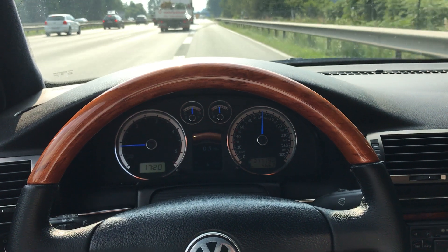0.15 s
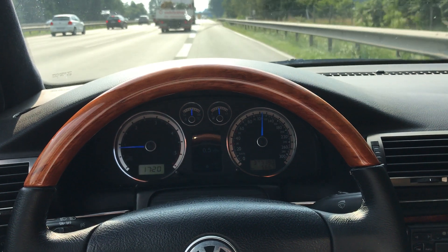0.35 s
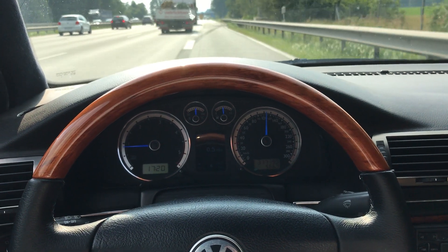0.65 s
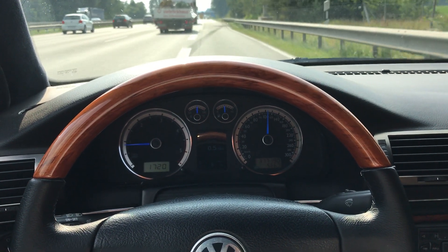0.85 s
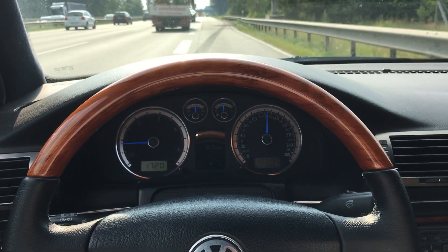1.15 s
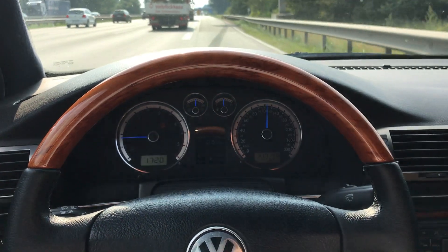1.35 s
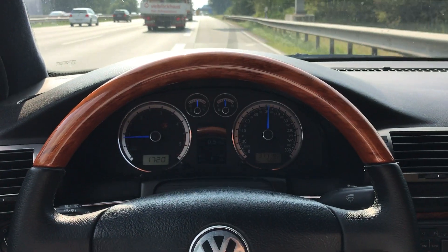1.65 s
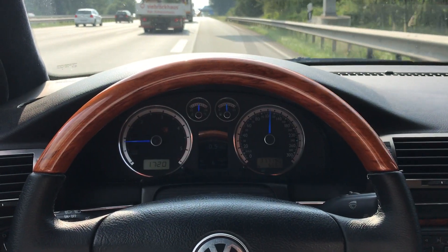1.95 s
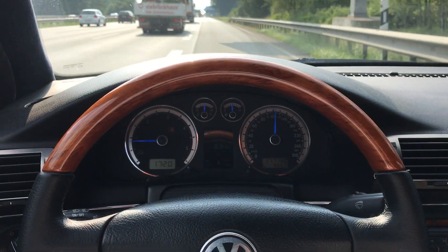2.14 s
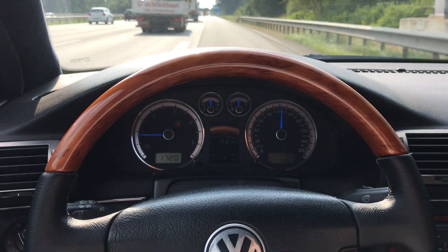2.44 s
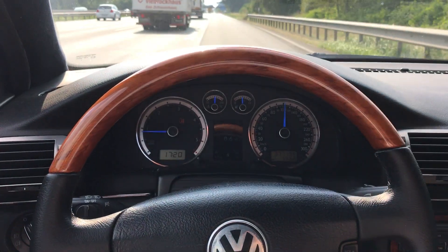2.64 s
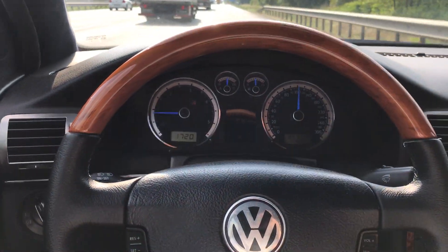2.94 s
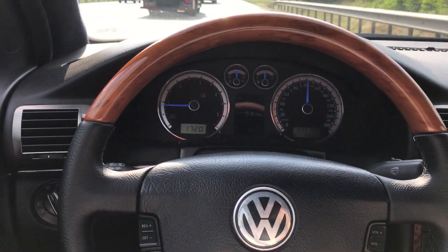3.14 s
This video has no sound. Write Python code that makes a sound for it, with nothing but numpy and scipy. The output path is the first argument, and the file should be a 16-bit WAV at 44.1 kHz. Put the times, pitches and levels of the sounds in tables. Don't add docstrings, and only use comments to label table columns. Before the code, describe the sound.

Inside a cruising car, booming bass rumble wavers with the road surface, strongest around 1.2 and 2.8 seconds. Quiet tyre noise, brief roadside swishes, thin wind hiss and tiny plastic ticks lie underneath; close phone microphone.

```python
import sys
import numpy as np
from scipy import signal
from scipy.fft import rfft, irfft, next_fast_len
from scipy.io import wavfile
from scipy.ndimage import uniform_filter1d

SR = 44100
rng = np.random.default_rng(int(sys.argv[2]) if len(sys.argv) > 2 else 0)


def inscribe(sig):
    pcm = np.round(np.clip(np.atleast_2d(sig).T, -1, 1) * 32767)
    wavfile.write(sys.argv[1], SR, pcm.astype(np.int16))


def linear_from_db(decibels):
    return 10 ** (np.asarray(decibels, float) / 20)


N = 145089

# [t/s, level/dB]
ROAD = [(.09, -23.5), (.3, -19.5), (.5, -24), (.66, -20.5), (.95, -27), (1.08, -19.5), (1.23, -20),
        (1.38, -30), (1.62, -22), (1.8, -22), (1.97, -28), (2.18, -25), (2.32, -24), (2.47, -27),
        (2.66, -26.5), (2.8, -17.5), (3.0, -30.5), (3.2, -21)]
# [t/s, level/dB]
GUST = [(.09, -45.5), (.3, -45.5), (.42, -48.5), (.74, -46), (.86, -48.5), (1.05, -49), (1.21, -45.5),
        (1.35, -50.5), (1.44, -48), (1.78, -47.5), (1.95, -51.5), (2.08, -49.5), (2.3, -48), (2.62, -50),
        (2.78, -47), (2.87, -48), (3.0, -50), (3.28, -47)]


def curve(table):
    return np.interp(np.arange(N) / SR, *np.array(table).T)


def deviation(level_db):
    return level_db - level_db.mean()


def unit(x):
    return x / np.sqrt(np.mean(x ** 2))


def bell(centre_s, length_s):
    return np.exp(-0.5 * ((np.arange(N) / SR - centre_s) / length_s) ** 2)


def walk(rate_hz):
    hold = int(SR / rate_hz)
    levels = rng.standard_normal(int(60 * N / SR) + 2)
    held = np.repeat(levels, hold)[:N + hold]
    return 1.3 * uniform_filter1d(uniform_filter1d(held, hold), hold)[:N]


def band(hz, width_hz):
    b, a = signal.iirpeak(hz, hz / width_hz, SR)
    x = rng.standard_normal(N)
    for _ in range(3):
        x = signal.lfilter(b, a, x)
    return unit(x)


def rush(colour, shared_db, own_db, own_rate_hz, count, evenness=0):
    even_s = 0.06
    size = next_fast_len(N)
    logf = np.log(np.arange(size // 2 + 1) * SR / size + 1e-3)
    at, db = np.log(np.array(colour)[:, 0]), np.array(colour)[:, 1]
    outside = np.maximum(at[0] - logf, 0) + np.maximum(logf - at[-1], 0)
    noise = rfft(rng.standard_normal(size)) * linear_from_db(np.interp(logf, at, db) - 37 * outside)
    centres = np.linspace(at[0], at[-1], count)
    shared = shared_db * walk(12)
    out = np.zeros(N)
    for k in range(count):
        share = np.interp(logf, centres, np.arange(count) == k)
        part = irfft(noise * share, size)[:N]
        swell = uniform_filter1d(part ** 2, int(even_s * SR)) / np.mean(part ** 2)
        steadied = part * (swell + 0.057) ** (-evenness / 2)
        out += steadied * linear_from_db(shared + own_db * walk(own_rate_hz))
    return unit(out)


def swings(table, length_s):
    out, busy = np.zeros(N), np.zeros(N)
    for s, db, hz in table:
        first = max(int((s - 6 * length_s) * SR), 0)
        last = min(int((s + 6 * length_s) * SR), N)
        t = np.arange(first, last) / SR - s
        out[first:last] += linear_from_db(db) * np.exp(-0.5 * (t / length_s) ** 2) * np.cos(2 * np.pi * hz * t)
        busy[first:last] += np.exp(-0.5 * (t / length_s / 2) ** 2)
    return out, np.minimum(busy, 1)


def boom():
    # [f/Hz, density/dB]
    boom_colour = [(20, -2), (31, -9.5), (43, -1.5), (100, -3.5), (150, -9), (192, -5.5), (287, -19),
                   (400, -36.5)]
    # [t/s, length/s, change/dB]
    easings = [
        (.17, .03, -4),
        (1.0, .03, -3),
        (2.19, .03, -5),
        (2.48, .025, -4),
        (2.65, .045, -9),
    ]
    easing_db = sum(db * bell(s, length_s) for s, length_s, db in easings)
    noise = rush(boom_colour, 0.78, 0.44, 7.14, count=7, evenness=0.7)
    return noise * linear_from_db(curve(ROAD) + 2.42 + easing_db)


def drone():
    # [f/Hz, density/dB]
    drone_colour = [(200, 0), (287, -6.5), (340, 5), (430, -6), (520, -6.5), (650, -13.5)]
    drone_db, follows_road = -40, 0.43
    noise = rush(drone_colour, 0.95, 0.58, 8.4, count=5)
    return noise * linear_from_db(drone_db + follows_road * deviation(curve(ROAD)))


def rumble():
    # [t/s, peak/dB, f/Hz]
    joints = [(0.096, -19, 164), (0.142, -15.5, 138), (0.386, -11.5, 142), (0.526, -13, 110.0),
              (0.579, -11, 127), (0.601, -18, 152), (0.639, -15.5, 164), (0.689, -18, 110.0),
              (0.791, -13.5, 158), (1.057, -10, 126), (1.105, -16, 130.0), (1.139, -13.5, 110.0),
              (1.186, -11, 173), (1.207, -4, 111), (1.251, -12.0, 100.0), (1.298, -13, 114),
              (1.595, -14.5, 154), (1.618, -14.0, 109), (1.634, -14.5, 142), (1.661, -12.5, 119),
              (1.768, -13.5, 144), (1.912, -17.5, 117), (2.099, -12.5, 127), (2.302, -9, 120.0),
              (2.34, -13.0, 137), (2.527, -13.5, 125), (2.568, -12.5, 130.0), (2.757, -7, 98),
              (3.153, -12, 110.0), (3.221, -12.5, 117)]
    # [t/s, peak/dB, f/Hz]
    humps = [(0.121, -14, 111.7), (0.187, -13.5, 162), (0.221, -14.5, 143), (0.244, -15, 90.0),
             (0.299, -15.0, 150.0), (0.345, -12.0, 130.0), (0.421, -12.5, 117), (0.669, -12.0, 119),
             (0.713, -22, 118), (0.745, -12.5, 144), (0.767, -12.5, 152), (0.829, -17, 140.0),
             (1.083, -13, 106), (1.157, -14, 120.0), (1.523, -15.0, 130.0), (1.576, -12, 105),
             (1.721, -18.5, 163), (1.747, -16, 120.0), (1.792, -14, 135), (1.818, -11, 80.0),
             (2.222, -15.5, 128), (2.377, -15, 162), (2.789, -9.5, 96), (2.826, -15.0, 195),
             (2.86, -11.5, 100.0), (2.917, -14, 110.0), (3.111, -14.5, 138), (3.171, -13.5, 98),
             (3.243, -14.5, 157), (3.281, -11.5, 110.0)]
    # [t/s, peak/dB, f/Hz]
    knocks = [(0.14, -24, 334), (0.213, -27, 358), (0.267, -31, 366), (0.352, -27.5, 312), (0.39, -32, 332),
              (0.44, -29.5, 368), (0.543, -26.5, 308), (0.598, -27.5, 392), (1.026, -33, 400),
              (1.082, -31.0, 320.0), (1.15, -25.5, 334), (1.19, -24, 351), (1.551, -27, 282),
              (1.588, -31.0, 360), (1.713, -28, 346), (1.764, -26, 313), (1.809, -26, 305),
              (1.882, -30, 310.0), (2.126, -33, 320.0), (2.25, -35, 353), (2.285, -33, 331),
              (2.341, -29, 363), (2.693, -28.5, 337), (2.748, -28.5, 357), (2.825, -27.5, 325),
              (2.868, -31.0, 310.0), (2.958, -32, 312), (3.168, -30.0, 334), (3.221, -31.5, 352),
              (3.289, -28, 346)]
    swing_len_s, knock_len_s = 0.0044, 0.0039
    boom_yields, drone_yields = 0.59, 0.49
    down, down_busy = swings(joints, swing_len_s)
    up, up_busy = swings(humps, swing_len_s)
    knock, knock_busy = swings(knocks, knock_len_s)
    steady_boom = boom() * (1 - boom_yields * np.maximum(down_busy, up_busy))
    steady_drone = drone() * (1 - drone_yields * knock_busy)
    return steady_boom + steady_drone + up - down + knock


def tyres():
    # [f/Hz, density/dB]
    tread_colour = [(450, -9), (622, -6), (972, -1.5), (1300, -6), (1540, -7.5), (1880, -14.5), (2700, -17)]
    tyre_db, follows_gust = -35, 0.45
    noise = rush(tread_colour, 0.83, 0.96, 12, count=8)
    return noise * linear_from_db(tyre_db + follows_gust * deviation(curve(GUST)))


def neighbour():
    # [f/Hz, density/dB]
    traffic_colour = [(750, -2.5), (900, -15), (1100, 9.5), (1300, -11), (1900, -8), (2500, -15)]
    traffic_db, gone_s = -36.5, 1
    return rush(traffic_colour, 0.5, 0.51, 14.7, count=5) * linear_from_db(traffic_db) * bell(0, gone_s)


def whine():
    whine_hz, width_hz, whine_db = 958, 57, -43
    return band(whine_hz, width_hz) * linear_from_db(whine_db + walk(5.3))


def wind():
    # [f/Hz, density/dB]
    hiss_colour = [(2000, -4.5), (2510, -11.5), (3500, -6), (4960, -10.5), (8800, -17), (11500, -19.5),
                   (16000, -26)]
    # [t/s, length/s, gain/dB]
    eddies = [(.38, .05, 2), (.53, 0.05, 1.5), (.72, .04, 1), (1.135, 0.013, 0), (1.225, 0.047, 2.5),
              (1.43, .02, 2), (1.778, 0.026, 1.5), (2.07, .02, 3.5), (2.2, 0.014, 2), (2.45, 0.0097, -0.5),
              (2.6, 0.075, -1.5), (2.74, 0.028, -1.5), (2.82, 0.045, 2), (2.885, 0.017, 1.5),
              (2.922, 0.018, -2)]
    eddy_db = sum(db * bell(s, length_s) for s, length_s, db in eddies)
    return rush(hiss_colour, 0.44, 0.88, 24, count=5) * linear_from_db(curve(GUST) + eddy_db - 0.75)


def posts():
    # [t/s, level/dB, f/Hz]
    passes = [(0.121, -29.5, 1090), (.265, -28.5, 1120), (.555, -27, 1070), (.63, -37, 970),
              (0.701, -32, 1180), (.85, -42, 1180), (.997, -33.5, 1120), (1.09, -29.5, 990),
              (1.225, -45, 1160), (.193, -35, 980), (.76, -34.5, 1100), (1.435, -31.5, 870),
              (1.516, -33, 930), (1.558, -31, 940), (2.218, -35, 1050), (2.886, -35.5, 945),
              (3.229, -32, 920)]
    post_len_s, width_hz = 0.0093, 650
    return sum(linear_from_db(db) * bell(s, post_len_s) * band(hz, width_hz) for s, db, hz in passes)


def modes():
    # [t/s, length/s, level/dB, f/Hz]
    swells = [(0.23, 0.032, -16.5, 53), (1.627, 0.043, -17.5, 40), (1.84, 0.03, -17.5, 44),
              (2.19, 0.027, -20.5, 79), (2.379, 0.073, -15.5, 51), (2.6, 0.052, -15, 79),
              (2.86, 0.063, -25.5, 59.5), (0.62, 0.028, -18, 51), (3.199, 0.071, -36, 59),
              (2.5, 0.027, -20, 48), (3.1, 0.033, -21.5, 50), (.72, 0.023, -20.5, 86),
              (2.6, 0.018, -21, 52), (0.62, 0.017, -22, 70), (1.6, 0.018, -23, 72), (2.05, .025, -22, 88.7),
              (0.33, 0.037, -31.5, 246), (1.62, 0.025, -28, 245), (2.7, .03, -33, 245),
              (.6, 0.045, -40, 421), (1.03, 0.033, -41.5, 510), (2.281, 0.057, -31.5, 325)]
    t = np.arange(N) / SR
    out = np.zeros(N)
    for s, length_s, db, hz in swells:
        out += linear_from_db(db) * bell(s, length_s) * np.sin(2 * np.pi * hz * (t - s))
    return out


def trim():
    # [t/s, peak/dB, f/Hz, width/Hz]
    ticks = [
        (1.088, -49, 6140, 900),
        (1.131, -42, 6460, 5000),
        (1.196, -51, 9000, 8000),
        (1.331, -57, 12700, 1500),
        (1.416, -53.5, 13000, 8000),
        (2.4435, -45, 6850, 1200),
        (2.4435, -48, 9140, 6000),
        (2.746, -46, 8180, 2500),
        (2.885, -52, 11000, 9000),
    ]
    rise_s, decay_s = 0.0015, 0.006
    out = np.zeros(N)
    for s, db, hz, width_hz in ticks:
        t = np.maximum(np.arange(N) / SR - s, 0)
        envelope = (1 - np.exp(-t / rise_s)) * np.exp(-t / decay_s)
        out += linear_from_db(db) * envelope * band(hz, width_hz)
    return out


def cabin(x):
    # [f/Hz, width/Hz, gain/dB]
    resonances = [(46.6, 7, 4.5), (2490, 130, 2.5), (418.7, 7.9, 8.5), (524, 46.4, -10), (551, 74, 7),
                  (609, 76, -3.5), (830, 10, 7), (1274, 42, 3.5), (1539, 68, 5.5), (1650, 100, -4),
                  (1880, 248, 7.5), (5040, 190, -3), (7730, 670, -2.5), (10450, 870, -5.5),
                  (2330, 48, 2), (2590, 72, 4), (2980, 58, 2), (3320, 74, 4), (4270, 28, 3), (4340, 20, 5),
                (5314, 40, 4), (7952, 70, 0)]
    size = next_fast_len(N)
    f = np.arange(size // 2 + 1) * SR / size
    gain_db = np.zeros(len(f))
    for hz, width_hz, db in resonances:
        gain_db += db / (1 + (2 * (f - hz) / width_hz) ** 2)
    return irfft(rfft(x, size) * linear_from_db(gain_db), size)[:N]


def scene():
    outside = rumble() + tyres() + neighbour() + whine() + wind() + posts()
    return (cabin(outside) + modes() + trim())[None]


def low_pass(x):
    return signal.sosfilt(signal.butter(12, 15770, fs=SR, output="sos"), x)


def record(dry):
    start_s, step_db, bass_cut_hz = 0.08415, -16, 19
    t = np.arange(N) / SR - start_s
    high_pass = signal.butter(4, bass_cut_hz, "high", fs=SR, output="sos")
    heard = signal.sosfilt(high_pass, dry)
    click = linear_from_db(step_db) * np.exp(-np.abs(t) / 0.00022)
    settling = heard[:, int(start_s * SR)] * np.exp(-np.abs(t) / 0.003)
    return low_pass((heard + click - settling) * (t >= 0))


dry = scene()
out = record(dry)
inscribe(out)
```